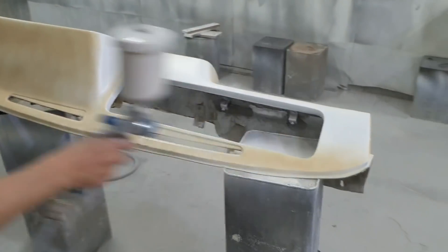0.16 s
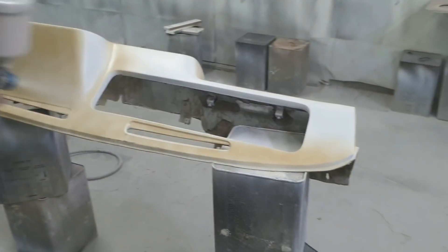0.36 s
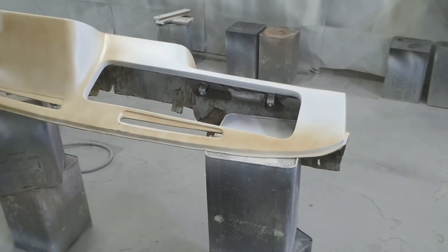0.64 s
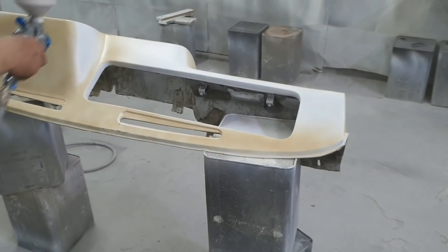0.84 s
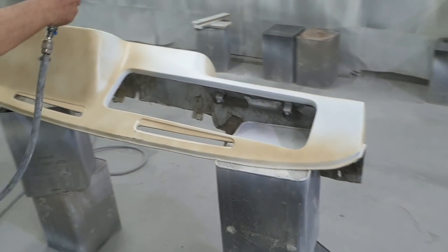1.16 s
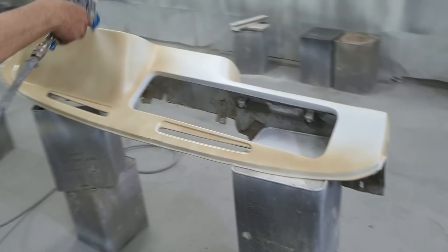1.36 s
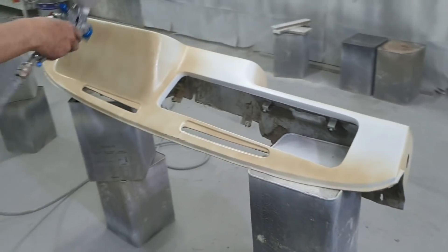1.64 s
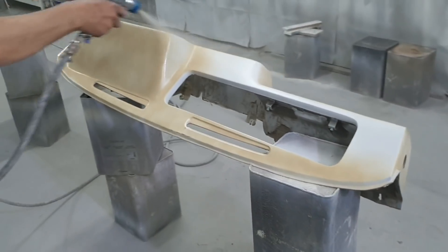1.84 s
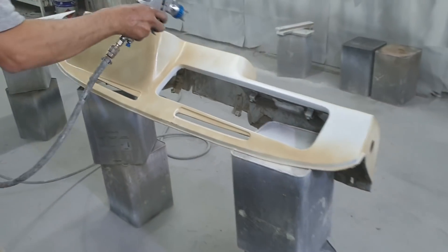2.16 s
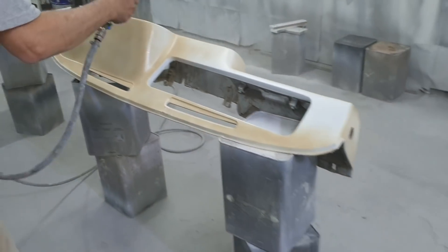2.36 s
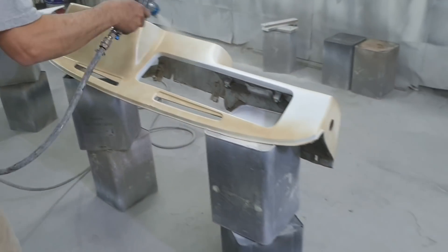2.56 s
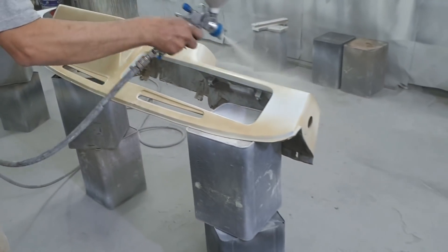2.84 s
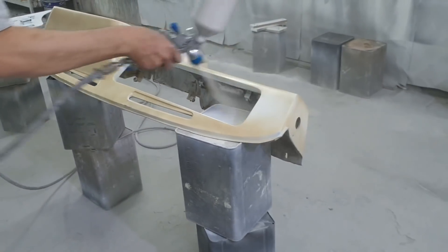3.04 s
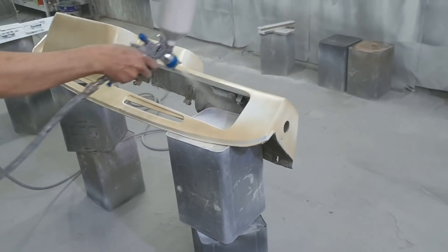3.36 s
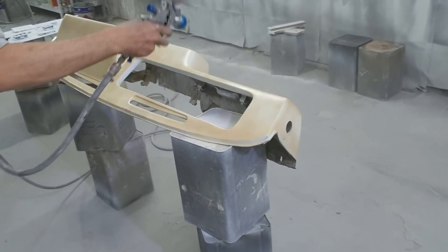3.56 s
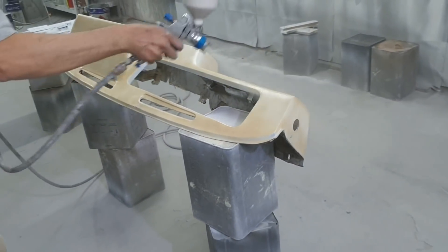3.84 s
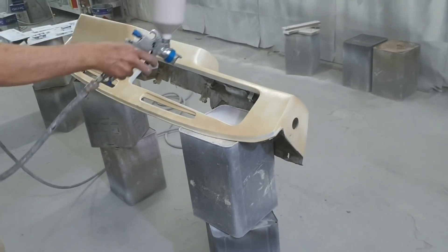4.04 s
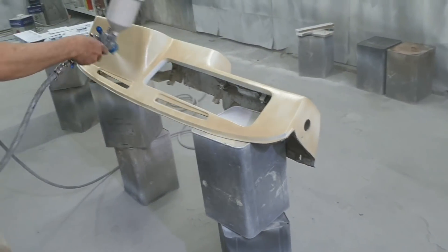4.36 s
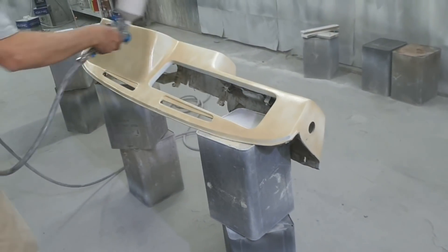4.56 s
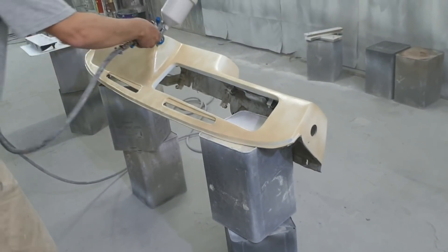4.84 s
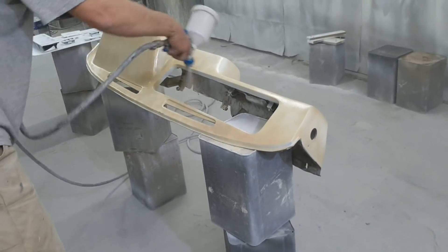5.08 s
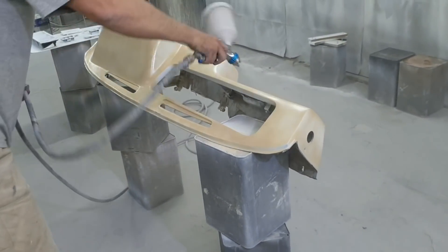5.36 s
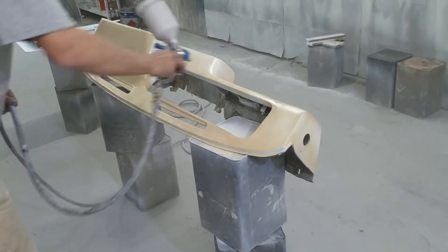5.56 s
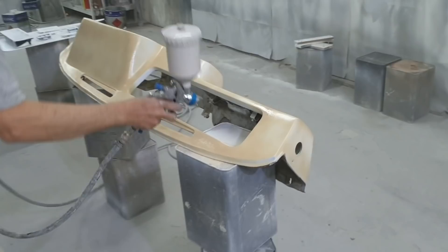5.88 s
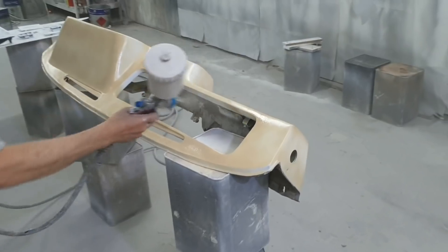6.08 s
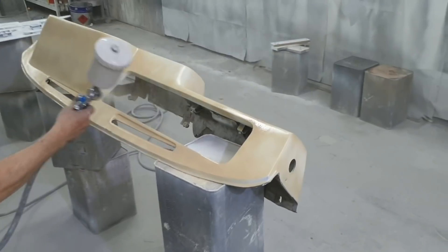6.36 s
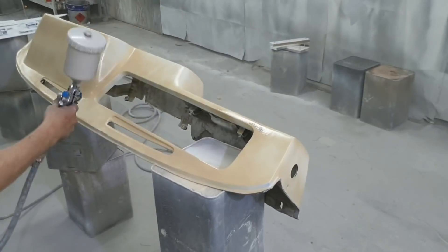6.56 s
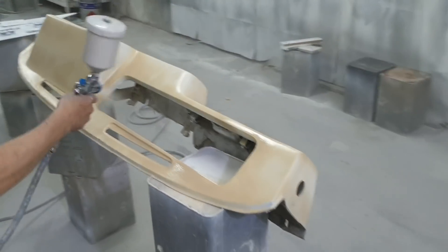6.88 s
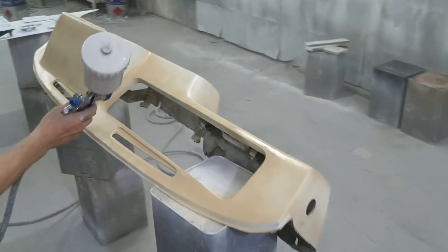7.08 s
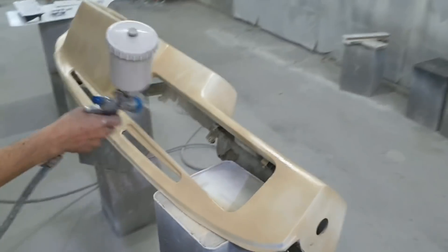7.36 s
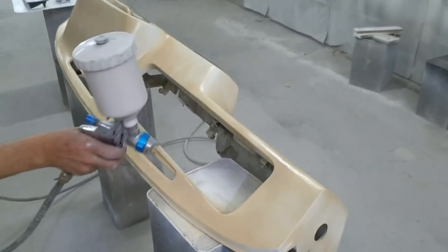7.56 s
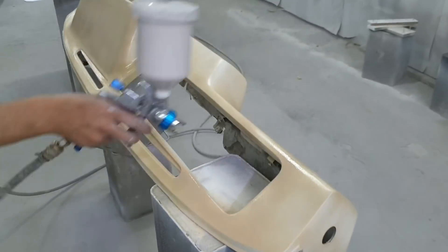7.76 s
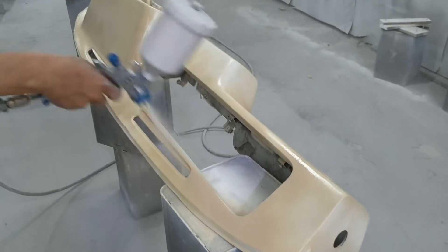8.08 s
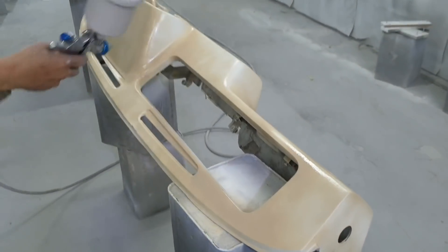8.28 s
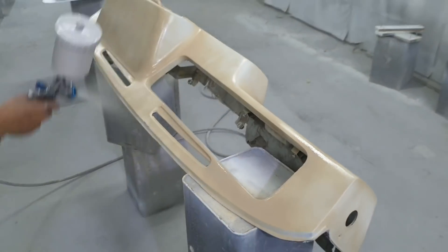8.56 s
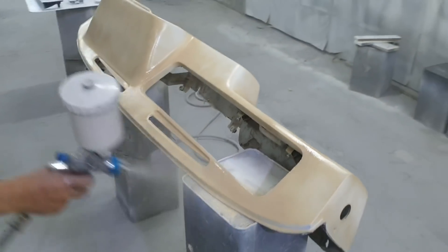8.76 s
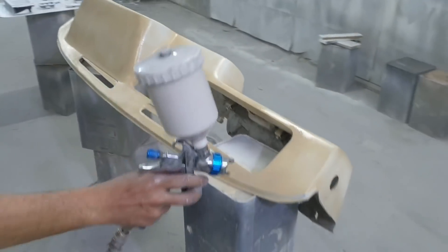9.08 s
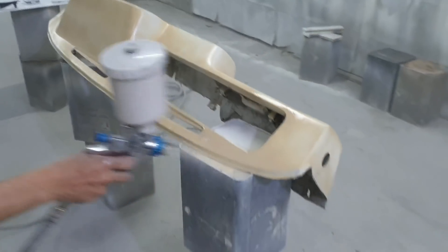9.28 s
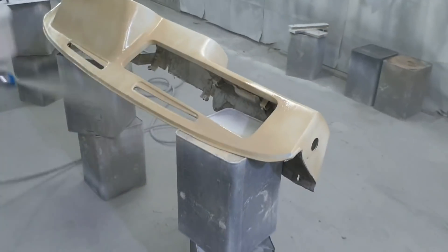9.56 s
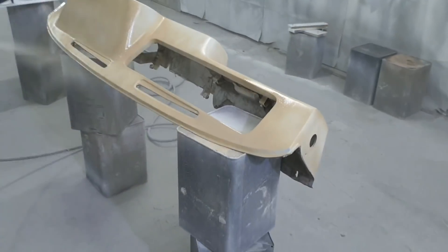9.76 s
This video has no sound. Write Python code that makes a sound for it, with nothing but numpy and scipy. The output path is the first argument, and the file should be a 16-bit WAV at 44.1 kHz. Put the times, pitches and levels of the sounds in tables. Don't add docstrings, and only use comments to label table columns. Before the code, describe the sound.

A spray gun hisses in short repeated passes over a plastic car part in a hard-walled booth, above a steady humming extractor fan.

```python
import sys
import numpy as np
from scipy import signal
from scipy.fft import rfft, irfft, next_fast_len
from scipy.io import wavfile
from scipy.ndimage import uniform_filter1d

SR = 44100
rng = np.random.default_rng(int(sys.argv[2]) if len(sys.argv) > 2 else 0)


def amp(db):
    return 10 ** (np.asarray(db, float) / 20)


def write(x):
    x = np.atleast_2d(x).T
    wavfile.write(sys.argv[1], SR, np.round(np.clip(x, -1, 1) * 32767).astype(np.int16))


N = 437472
SIZE = next_fast_len(N + SR)
HZ = np.maximum(np.arange(SIZE // 2 + 1) * SR / SIZE, 1)
T = np.arange(N) / SR

# [f/Hz, width/Hz]
FAN_TONES = [(159.5, 5), (70.5, 4), (312, 7)]
# [f/Hz, width/Hz, level/dB]
DUCT_MODES = [(96, 18, -51), (198.3, 17, -45.5), (250, 13, -50), (430, 11, -50), (514.6, 6.5, -56)]
# [t/s, level/dB]
STANDING_WAVE = [(0.0, -28), (0.65, -27.5), (1.1, -34.5), (1.9, -25.5), (2.3, -33.5), (3.15, -29.5),
                 (3.3, -41), (4.1, -32.5), (5.2, -33), (6.2, -40), (6.9, -30), (7.3, -28.5), (7.7, -33.5),
                 (8.1, -34.5), (8.9, -34.5), (9.3, -28.5), (9.48, -40), (9.62, -29.5), (9.72, -28.5),
                 (9.79, -34)]
# [t/s, level over the hum/dB]
BLADE_SURGES = [(0.05, 2), (0.22, -1), (0.35, 8), (0.46, 3), (0.62, 6.5), (0.75, -1), (0.98, 7), (1.22, 8),
                (1.36, 5), (1.57, -9), (1.88, -5), (2.45, 4), (2.59, 4), (2.75, 0), (2.93, 2), (3.18, -5),
                (3.47, 14), (3.72, 1), (4.58, -12), (4.77, -1), (5.64, 9), (5.74, -11), (6.49, 2),
                (6.68, -3), (7.39, 7), (7.86, 4.5), (8.19, 9), (8.52, 1), (8.86, 9.5), (9.05, 2)]
# [t/s, level/dB]
DUCT_SWELLS = [(0.05, -52), (0.7, -45), (1.09, -41.5), (1.58, -44), (2.05, -47), (2.46, -43), (2.98, -43),
               (3.27, -51), (3.63, -43), (3.95, -51), (4.7, -44), (5.02, -51), (5.36, -41.5), (5.75, -41.5),
               (6.35, -45), (7.2, -47), (7.66, -45), (7.95, -51.5), (8.7, -45), (8.98, -45), (9.4, -53),
               (9.7, -57)]
# [f/Hz, level/dB]
RUSH_SPECTRUM = [(25, -46), (45, -38.5), (60, -17), (100, -13.5), (135, 0.5), (210, 0), (280, -7.5),
                 (450, -9.5), (800, -11), (1300, -16), (2200, -21), (3500, -22), (6500, -31), (9000, -31.5),
                 (16000, -37)]
# [f/Hz, correlation]
RUSH_COHERENCE = [(60, 0.9), (250, 0.83), (500, 0.55), (900, 0.093), (1400, -0.32), (2500, 0.05)]
TRIGGER_PULLS = [(0.0, .55, 4, 5), (0.639, .245, 10.5, 6), (0.973, 0.27, 11.5, 6), (1.3, 0.26, 10.5, 7),
                 (1.827, 0.33, 8.5, 6), (2.225, 0.26, 8.5, 0.5), (2.525, 0.72, 3.5, 3.5),
                 (3.367, 0.29, 10.5, 1.5), (3.766, 0.24, 9.5, 5), (4.173, 0.36, 12.5, 0.5),
                 (4.855, 0.7, 8, 2), (6.009, 0.57, 12, -6), (6.844, 0.25, 9.5, 3), (7.298, .428, 5, -6),
                 (7.939, .3, 17, 3), (8.522, 0.57, 6, -3), (9.283, 0.73, 11.5, -4)]
SQUARENESS = [-0.58, 0.87, 0.24, 0, -0.72, -0.35, -0.21, 0.14, 0.8, 0.66, -0.82, 0, 0, -0.31, -1.4, -0.59,
              0]
# [t/s, paint jet level/dB, left minus right level/dB]
GUN_SWEEP = [(0.0, -25.5, -1), (0.5, -28.5, 1), (1.2, -28.5, 0.5), (2.0, -26.5, 1), (2.6, -28, 1),
             (3.201, -27, 0.5), (3.9, -27, 0), (4.4, -28.5, 0.5), (4.95, -28, 1), (5.55, -25, 0.5),
             (6.3, -28, 0.5), (7.0, -28.5, 1.5), (7.5, -25.5, 0), (7.7, -29, -0.5), (8.15, -28, 1),
             (8.701, -28.5, 1), (9.1, -25.5, -0.5), (9.8, -30, 1.5)]
# [f/Hz, level/dB]
JET_SPECTRUM = [(300, -16), (1000, -12), (2000, -12.5), (4000, -4.5), (8000, -3.5), (12000, 1.5),
                (16500, -8)]
# [top level/dB, middle level/dB, roar on the part level/dB]
PAINT_REGISTERS = (1.5, -1, -8.5)
# [top level/dB, middle level/dB, roar level/dB]
AIR_REGISTERS = (0, -5, -35.5)
# [paint level/dB, first blast level/dB, last blast level/dB]
DIRECT_LEVELS = (-10, -14.5, -1)
# [top level/dB, middle level/dB, roar level/dB]
BEAM_LEVELS = (12.5, 11.5, -9)
# [f/Hz, t60/s]
BOOTH_DECAY = [(500, 0.14), (2000, 0.61), (5000, 0.66), (9000, 0.62), (14000, 0.41)]
# [f/Hz, left level/dB, right level/dB]
PORT_COLOUR = [(160, 1, -1), (990, -1, -1.5), (2400, 0, 3), (3650, -4.5, -1.5), (5160, -5, 5),
               (6330, -6.5, 5.5), (6990, -9, 0), (8670, -2, -8.5), (10060, -1, -2.5), (12350, 0.5, 0),
               (14300, 0, 1), (15700, -2.5, -3)]


def along(table, column=1):
    rows = np.array(table, float)
    return np.interp(np.log(HZ), np.log(rows[:, 0]), rows[:, column])


def shape(x, gain):
    return irfft(rfft(x, SIZE) * gain, SIZE)[..., :N]


def unit(x):
    return x / np.sqrt(np.mean(x ** 2))


def walk(rate):
    hold = int(SR / rate)
    steps = np.repeat(rng.standard_normal(N // hold + 1), hold)
    smooth = uniform_filter1d(uniform_filter1d(steps, hold), hold)
    return unit(smooth[:N])


def pulse(centre_s, length_s):
    return np.exp(-((T - centre_s) / length_s) ** 2)


def mode(hz, width, loose):
    mid, side = shape(rng.standard_normal((2, N)), 1 / (1 + ((HZ - hz) / width) ** 2))
    mid = unit(mid)
    envelope = np.abs(signal.hilbert(mid))
    waver = mid / (envelope + loose)
    return unit(waver) + 0.17 * unit(side) * np.array([[1], [-1]])


def fan_tones():
    blade_db = np.interp(T, *np.transpose(STANDING_WAVE))
    surges = 1 + sum(amp(db) * pulse(s, 0.024) for s, db in BLADE_SURGES)
    swells = sum(amp(db) * pulse(s, 0.094) for s, db in DUCT_SWELLS)
    hum = amp(blade_db - 2 + 1.4 * walk(22)) * surges
    low_mode = amp(-51.5) + swells
    second = amp(-45 + 0.43 * (blade_db - blade_db.mean()) + 1.5 * walk(6))
    levels = hum, low_mode, second
    return sum(level * mode(hz, width, loose=0.53) for (hz, width), level in zip(FAN_TONES, levels))


def duct_rush():
    level_db, fall_db_per_s = -37, -0.31
    alike = np.clip(along(RUSH_COHERENCE), -.99, .99)
    colour = amp(along(RUSH_SPECTRUM))
    mid, side = rng.standard_normal((2, N))
    mid = shape(mid, colour * np.sqrt(1 + alike))
    side = shape(side, colour * np.sqrt(1 - alike))
    level = amp(level_db + fall_db_per_s * T + 6.5 + 0.13 * walk(3.7))
    return level * unit(np.array([mid + side, mid - side]))


def extractor():
    modes = sum(amp(db + 1.5 * walk(3.3)) * mode(hz, width, loose=0.9) for hz, width, db in DUCT_MODES)
    return fan_tones() + modes + duct_rush()


def puff():
    corner_hz, level_db = 40, -49
    buffet = unit(shape(rng.standard_normal((2, N)), 1 / (1 + (HZ / corner_hz) ** 4)))
    return amp(level_db) * pulse(7.7, .05) * buffet


def trigger():
    valve_rise_s = 0.0062
    first_air_s, last_air_s = 0.032, 0.023
    paint_comes_s, paint_stops_s = 0.016, 0.049
    flows = np.zeros((4, N))
    for (opens, held, first_db, last_db), square_db in zip(TRIGGER_PULLS, SQUARENESS):
        since, left = T - opens, opens + held - T
        valve = np.clip(since / valve_rise_s, 0, 1) ** 2 * (left > 0)
        first = amp(first_db) ** 2 * np.exp(-np.abs(since) / first_air_s)
        last = amp(last_db) ** 2 * np.exp(-np.abs(left) / last_air_s)
        covered = np.clip(since / paint_comes_s, 0, 1) * np.clip(left / paint_stops_s, 0, 1)
        flows += valve * np.array([np.ones(N), first, last, amp(square_db) ** 2 * covered])
    return flows


def booth(power, colour):
    gap_s = 0.0021
    t = np.arange(SR) / SR
    centres = np.log2([hz for hz, _ in BOOTH_DECAY])
    noise = unit(shape(rng.standard_normal((2, N)), colour))
    out = 0
    for k, (_, t60) in enumerate(BOOTH_DECAY):
        share = np.interp(np.log2(HZ), centres, np.eye(len(BOOTH_DECAY))[k])
        decay = (amp(-60 * t / t60) * np.clip(t / gap_s - 1, 0, 1)) ** 2
        held = shape(power, rfft(decay / decay.sum(), SIZE))
        out = out + shape(noise, share) * np.sqrt(np.maximum(held, 0))
    return out


def lag(seconds):
    return np.exp(-2j * np.pi * HZ * seconds * np.array([[0], [1]]))


def aim():
    aimed_s = 7.69
    facing = np.exp(-((T - aimed_s) / .036) ** 4)
    turning = 0.52 * pulse(aimed_s, 0.12) * (T < aimed_s)
    return np.maximum(facing, turning)


def gun():
    s, near_db, side_db = np.transpose(GUN_SWEEP)
    seating = int(0.01 * SR)
    *flows, on_part = uniform_filter1d(trigger(), seating) * amp(np.interp(T, s, near_db)) ** 2
    paint, first, last = flows
    air = first + last
    total = paint + air + 1e-12
    direct = np.sqrt(np.maximum(amp(np.array(DIRECT_LEVELS)) ** 2 @ flows / total, 0))
    aimed = aim()
    pan_db = np.interp(T, s, side_db) + 3 * uniform_filter1d(last / total, int(.15 * SR))
    upper = 1 / (1 + (7800 / HZ) ** 12)
    lower = 1 / (1 + (HZ / 3300) ** 10)
    shares = upper, 1 - upper - lower, lower
    registers = zip((paint, paint, on_part), PAINT_REGISTERS, AIR_REGISTERS, shares, BEAM_LEVELS)
    sputter = amp(0.27 * walk(30))
    out = straight = beamed = 0
    for flow, paint_db, air_db, share, beam_db in registers:
        level = np.sqrt(np.maximum(amp(paint_db) ** 2 * flow + amp(air_db) ** 2 * air, 0))
        colour = amp(along(JET_SPECTRUM)) * np.sqrt(np.maximum(share, 0))
        jet = level * sputter * unit(shape(rng.standard_normal(N), colour))
        straight = straight + jet * direct
        beamed = beamed + jet * amp(beam_db) * aimed
        out = out + amp(1.0) * booth(level ** 2, colour)
    out = out + shape(straight, lag(0.000298)) + shape(beamed, lag(.00008))
    return out * amp(pan_db * np.array([[.5], [-.5]]))


def scene():
    return extractor() + puff() + gun()


def band_limit(x):
    return signal.sosfilt(signal.butter(12, 15950, fs=SR, output="sos"), x)


def record(dry):
    top_hz, stop_s = 15750, 9.797
    cut = 1 / (1 + np.exp(np.clip((HZ - top_hz) / 25, -50, 50)))
    rounded = np.tanh(1.1 * dry) / 1.1
    ports = rounded * np.clip((stop_s - T) / .004, 0, 1)
    colour = amp(np.array([along(PORT_COLOUR), along(PORT_COLOUR, column=2)]))
    return band_limit(shape(ports, cut * colour))


dry = scene()
out = record(dry)
write(out)
```